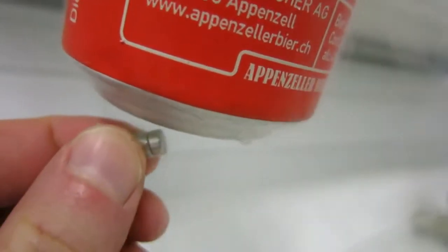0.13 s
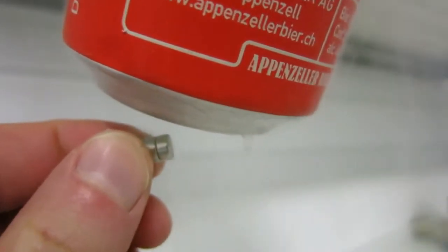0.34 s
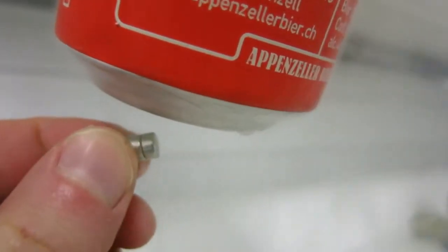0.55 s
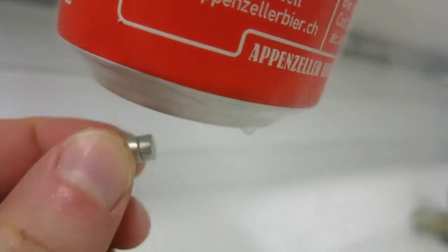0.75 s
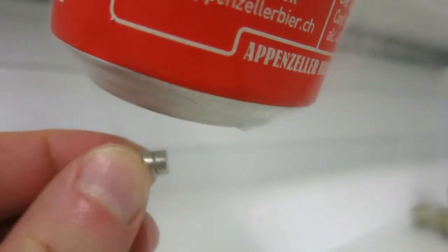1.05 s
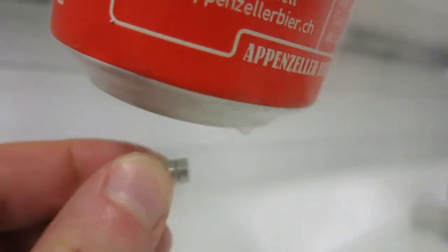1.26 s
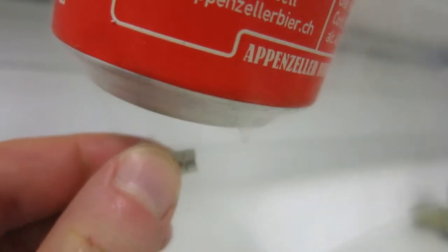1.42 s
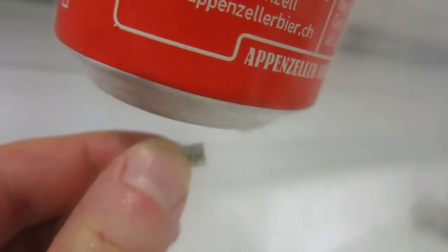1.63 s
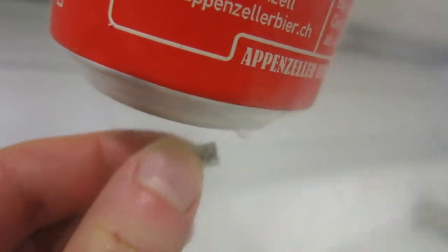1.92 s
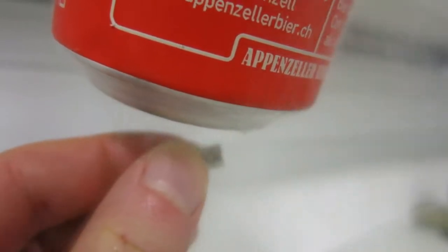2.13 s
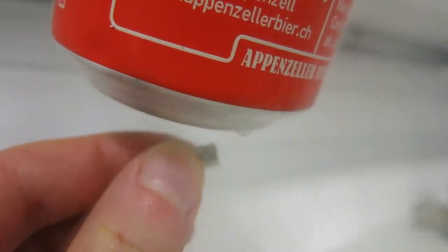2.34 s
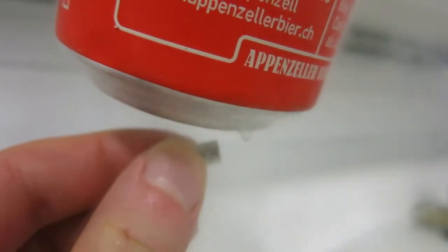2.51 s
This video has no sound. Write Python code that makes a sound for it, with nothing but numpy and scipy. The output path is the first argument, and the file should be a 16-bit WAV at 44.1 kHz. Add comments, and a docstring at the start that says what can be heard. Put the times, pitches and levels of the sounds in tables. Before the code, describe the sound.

Faint, bright spits and fizz of boiling liquid nitrogen against a ventilation fan's steady drone.

```python
"""Liquid nitrogen boiling in a can

Nitrogen boils in a thin drink can close to a phone: drops flash to gas in short bright spits over
a fine fizz. A ventilation fan fills the room with air rush, a blade tone and its overtones.
Behind them are a low room rumble and two faint whines."""
import sys
import numpy as np
from scipy import signal
from scipy.fft import rfft, irfft
from scipy.io import wavfile
from scipy.ndimage import uniform_filter1d

SR = 44100
rng = np.random.default_rng(int(sys.argv[2]) if len(sys.argv) > 2 else 0)


def generate_wav(signal):
    """Clip the signal to [-1, 1] and save it as 16-bit WAV at the path in sys.argv[1]."""
    frames = np.transpose(np.atleast_2d(signal))
    scaled = np.clip(frames, -1, 1) * 32767
    pcm = np.round(scaled).astype(np.int16)
    wavfile.write(sys.argv[1], SR, pcm)


N = 117747


def spit(peak_db, centre_hz, hold_ms, half_width_oct):
    """One drop flashing to gas: grainy noise that holds, dies fast and leaves a softer sizzle."""
    rise_ms, burst_t60_s, tail_t60_s, tail_db = 2.5, .045, .13, -8
    grain_db, grain_samples = 3, 20  # uneven droplets within the spit
    n = SR // 8
    t = np.arange(n) / SR
    decay_s = np.maximum(t - hold_ms / 1000, 0)
    envelope = undb(-60 * decay_s / burst_t60_s) + undb(tail_db - 60 * decay_s / tail_t60_s)
    envelope *= np.minimum(t * 1000 / rise_ms, 1)
    grains = undb(grain_db * np.repeat(rng.standard_normal(n // grain_samples + 1), grain_samples)[:n])
    hz = np.arange(n // 2 + 1) * SR / n + 1
    band = 1 / (1 + (np.log2(hz / centre_hz) / half_width_oct) ** 2)
    burst = irfft(rfft(rng.standard_normal(n) * grains) * band, n) * envelope
    return burst * undb(peak_db) / np.abs(burst).max()


def boil():
    """Boiling nitrogen: distinct spits among many small random ones."""
    # distinct spits: start_s, peak_db, centre_hz, hold_ms, half_width_oct
    spits = [(0.0413, -33, 12800, 4.5, 0.69), (0.0844, -42, 8060, 4.5, 0.35),
             (0.2045, -30, 12200, 4.5, 0.66), (0.2433, -40, 12700, 4.5, 0.35),
             (0.2694, -38, 10800, 4.5, 0.35), (0.298, -36.5, 9100, 4.5, 0.22),
             (0.3155, -33.5, 12500, 5, 0.38), (0.6892, -36, 11000, 4.5, 0.35),
             (0.7124, -37.5, 7900, 4.9, 0.25), (0.7494, -40, 11000, 4.5, 0.35),
             (0.804, -31, 12300, 12, 0.6), (0.8494, -39, 10700, 4.5, 0.35), (0.88, -38.5, 7100, 5, 0.25),
             (1.021, -42, 5000, 3, 0.22), (1.047, -27.5, 12000, 5.5, 0.54), (1.0624, -38, 14400, 4.5, 0.35),
             (1.088, -31, 13000, 4.5, 0.5), (1.104, -35.5, 12600, 2, 0.35), (1.131, -32, 12800, 4.5, 0.5),
             (1.3394, -27.5, 14400, 3.7, 1), (1.379, -38, 11000, 4.5, 0.5), (1.408, -38, 10300, 5, 0.3),
             (1.436, -36, 8800, 4, 0.2), (1.461, -42, 6200, 4, 0.17), (1.5579, -36.5, 10800, 4.5, 0.35),
             (1.5844, -34, 13200, 4.5, 0.35), (1.6155, -32, 6900, 3.3, 0.3),
             (1.6272, -31.5, 6900, 2.5, 0.37), (1.6275, -39.5, 3200, 1.5, 0.47),
             (1.68, -35.5, 7170, 4.2, 0.28), (1.6965, -25.5, 12400, 5.5, 0.6),
             (1.7204, -34, 12700, 4.5, 0.44), (1.7624, -36, 14000, 4.5, 0.35),
             (1.7755, -37, 12800, 4.5, 0.35), (1.8155, -28.5, 11500, 9, 0.5),
             (1.936, -35, 12400, 4.1, 0.35), (1.9645, -32, 12800, 4.5, 0.35), (2.041, -34, 12800, 3.7, 0.4),
             (2.063, -39, 9000, 4, 0.3), (2.0755, -34.5, 10800, 5, 0.4), (2.092, -38, 9300, 8, 0.3),
             (2.136, -29.5, 13000, 4.5, 0.38), (2.158, -35, 12300, 9, 0.45), (2.278, -34, 13000, 1.5, 0.35),
             (2.295, -32, 12300, 2.8, 0.61), (2.3175, -32.5, 13000, 5.5, 0.49),
             (2.357, -30, 13500, 4.5, 0.35), (2.491, -36.5, 10800, 4.5, 0.39),
             (2.5631, -34, 14300, 4.5, 0.35), (2.6494, -35, 12900, 4.5, 0.31)]
    small_per_s, small_hold_ms, small_half_width_oct = 61, 2.7, .51
    small_spits = []
    for _ in range(int(small_per_s * N / SR)):
        start_s = rng.uniform(0, N / SR)
        peak_db = rng.uniform(-45, -40)
        centre_hz = rng.uniform(7810, 14300)
        small_spits.append((start_s, peak_db, centre_hz, small_hold_ms, small_half_width_oct))
    out = np.zeros(N + SR)
    for start_s, *settings in list(spits) + small_spits:
        burst = spit(*settings)
        start = int(start_s * SR)
        out[start:start + len(burst)] += burst
    return out[:N]


def fizz():
    """Fine fizz of the boil: bright noise with a slight flicker."""
    # fizz spectrum: freq_hz, relative_density_db
    spectrum = [(2000, -6), (4000, -8), (6000, -1), (9000, -7.5), (12500, -2.5), (14500, -6), (15700, -7)]
    level_db, flicker_db = -52, .5
    return coloured_noise(spectrum) * undb(level_db - flicker_db * wander(rate_hz=12.05))


def fan_blades():
    """Blade-pass tone and two overtones; unequal blades throb once a turn."""
    # blade tones: harmonic, base_rms_db, waver_db
    tones = [(1, -41, 1.5), (2, -42.5, 0.5), (3, -53.5, 3)]
    # swell of harmonic 1: time_s, gain_db
    first_swell = [(0, 1), (.4, 1), (.5, -6), (.6, 1), (.75, -4.5), (.95, 2), (1.05, 2.5), (1.14, -6.5),
                   (1.25, 1), (1.9, 1.5), (2.2, -2.5), (2.5, 0), (2.56, 3), (2.67, 0.5)]
    # swell of harmonic 2: time_s, gain_db
    second_swell = [(0, -1), (.1, 6.5), (.28, -1.5), (.38, 3), (.52, -5), (.6, 4), (.73, -9), (.8, 6),
                    (.93, -2), (1.05, 9), (1.15, -19), (1.25, 3), (1.37, 2.5), (1.45, 2), (1.65, 3.5),
                    (1.8, 0), (2.05, -2), (2.2, -10), (2.26, 4.5), (2.31, -3), (2.37, 2.5), (2.5, 1),
                    (2.56, -5), (2.67, 3.5)]
    blade_pass_hz, drift_fraction, blade_count, throb_depth = 283.35, .0008, 12, .26
    pitch_hz = blade_pass_hz * (1 + drift_fraction * wander(rate_hz=2.99))
    phase = 2 * np.pi * np.cumsum(pitch_hz) / SR
    throb = 1 + throb_depth * np.cos(phase / blade_count)
    swell = {1: gain_curve(first_swell), 2: gain_curve(second_swell)}
    out = np.zeros(N)
    for harmonic, base_rms_db, waver_db in tones:
        rms = undb(base_rms_db + waver_db * wander(rate_hz=20)) * swell.get(harmonic, 1)
        out += np.sqrt(2) * rms * throb * np.sin(harmonic * phase + 2 * np.pi * rng.random())
    return out


def fan_rush():
    """Air moved by the fan: broad, nearly steady noise."""
    # rush spectrum: freq_hz, relative_density_db
    spectrum = [(60, -17), (150, -12.5), (240, -4.5), (300, -8.5), (400, -11.5), (460, -7), (490, -9.5),
                (545, -2.5), (600, -2), (660, -12.5), (720, -8.5), (900, -9.5), (1400, -15.5),
                (2200, -23.5), (3200, -32), (6000, -43.5)]
    # rush level: time_s, rms_db
    levels = [(0, -37), (.5, -37.5), (1, -37), (1.5, -36.5), (2, -36.5), (2.67, -37)]
    return coloured_noise(spectrum) * gain_curve(levels)


def room_rumble():
    """Low, gently swelling noise with a room resonance."""
    # rumble spectrum: freq_hz, relative_density_db
    spectrum = [(20, -31), (35, -21), (55, -8.5), (85, -0.5), (97, -2), (106, 3.5), (118, -3.5), (170, -1),
                (230, -18.5), (400, -36.5)]
    # rumble level: time_s, rms_db
    levels = [(0, -41), (.6, -40), (1.2, -39), (1.5, -40.5), (1.85, -37.5), (2.07, -37), (2.17, -41),
              (2.4, -40), (2.55, -38.5), (2.67, -38)]
    return coloured_noise(spectrum) * gain_curve(levels)


def whines():
    """Two faint steady tones."""
    # whines: pitch_hz, rms_db
    tones = [(2024.4, -69), (3643.5, -74)]
    t = np.arange(N) / SR
    return sum(np.sqrt(2) * undb(rms_db) * np.sin(2 * np.pi * hz * t) for hz, rms_db in tones)


def undb(db):
    """Decibels to gain."""
    return 10 ** (np.asarray(db) / 20)


def gain_curve(points):
    """Gain per sample through (time_s, level_db) points."""
    time_s, level_db = np.array(points).T
    return undb(np.interp(np.arange(N) / SR, time_s, level_db))


def coloured_noise(spectrum):
    """Unit-rms noise shaped through (freq_hz, relative_density_db) points."""
    freq_hz, density_db = np.array(spectrum).T
    bin_hz = np.arange(N // 2 + 1) * SR / N + 1
    gain = undb(np.interp(np.log(bin_hz), np.log(freq_hz), density_db))
    noise = irfft(rfft(rng.standard_normal(N)) * gain, N)
    return noise / np.sqrt(np.mean(noise ** 2))


def wander(rate_hz):
    """Random steps smoothed twice; zero mean, unit spread."""
    hold = int(SR / rate_hz)
    steps = np.repeat(rng.standard_normal(N // hold + 1), hold)
    smooth = uniform_filter1d(uniform_filter1d(steps, hold), hold)[:N]
    return (smooth - smooth.mean()) / smooth.std()


def scene():
    """Can, fan and room in mono."""
    return (boil() + fizz() + fan_blades() + fan_rush() + room_rumble() + whines())[None]


def record(dry):
    """Phone microphone: the highest treble droops, then is cut off."""
    droop_from_hz, cutoff_hz, droop_db = 14700, 15740, -10
    hz = np.arange(N // 2 + 1) * SR / N
    droop = undb(np.interp(hz, [droop_from_hz, cutoff_hz], [0, droop_db]))
    lowpass = signal.ellip(14, .2, 80, cutoff_hz, fs=SR, output="sos")
    return signal.sosfilt(lowpass, irfft(rfft(dry) * droop, N))


dry = scene()
out = record(dry)
generate_wav(out)
```